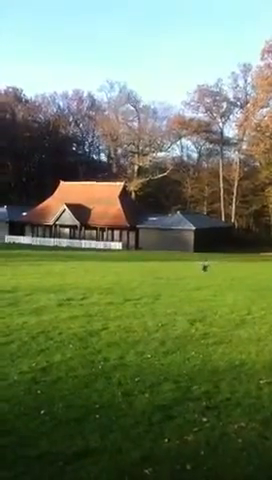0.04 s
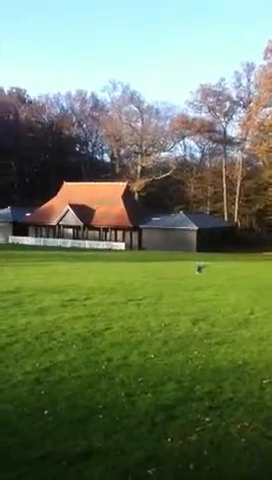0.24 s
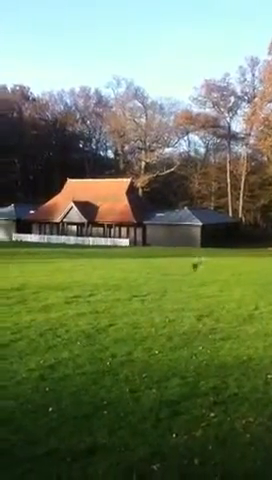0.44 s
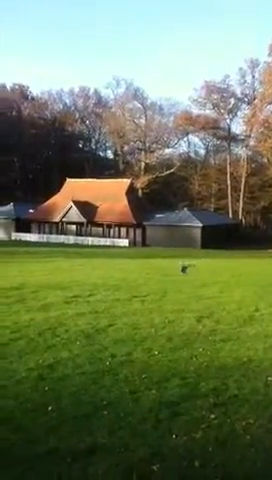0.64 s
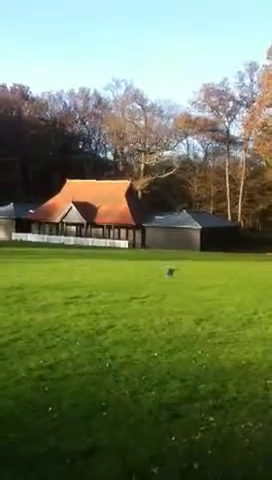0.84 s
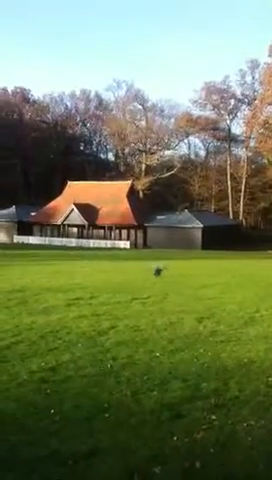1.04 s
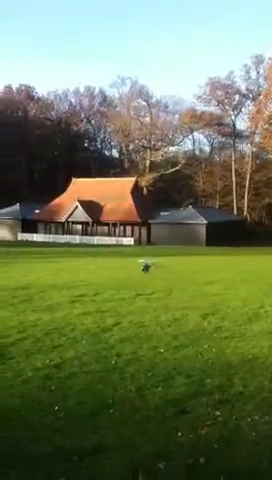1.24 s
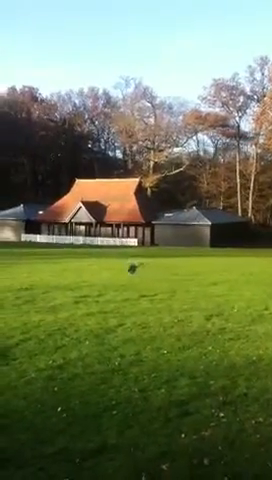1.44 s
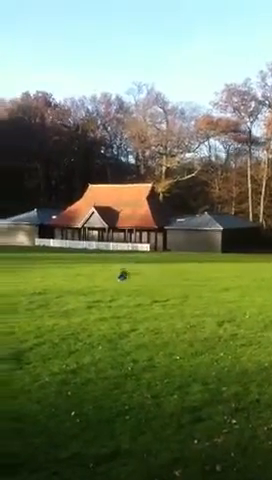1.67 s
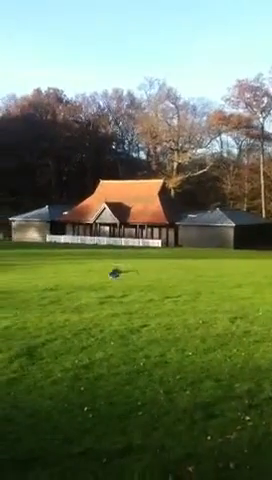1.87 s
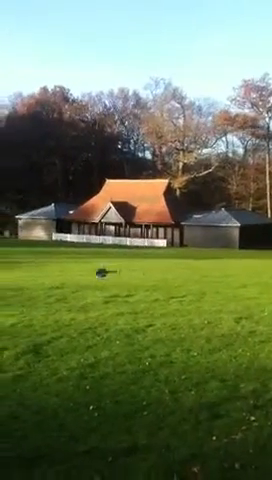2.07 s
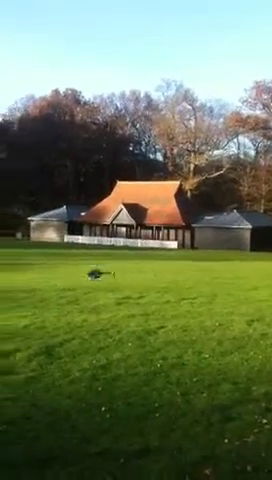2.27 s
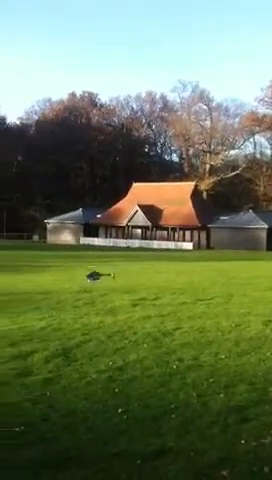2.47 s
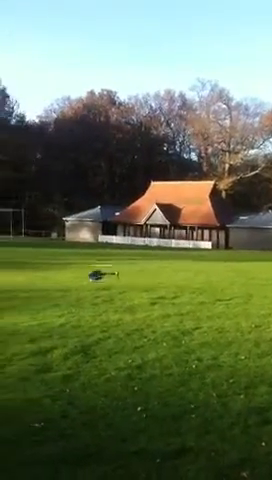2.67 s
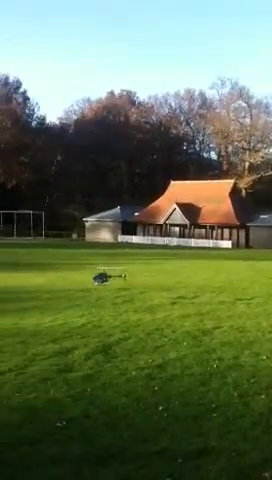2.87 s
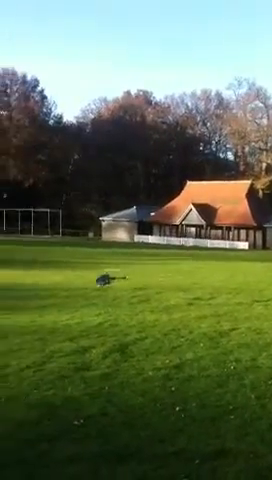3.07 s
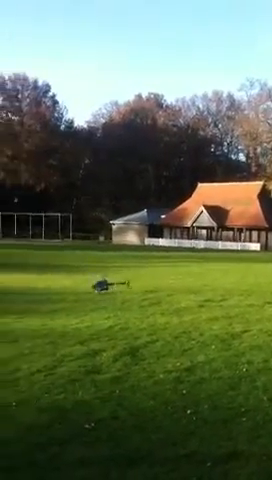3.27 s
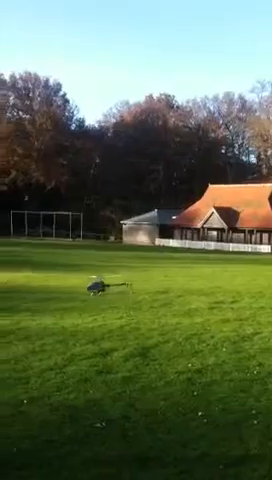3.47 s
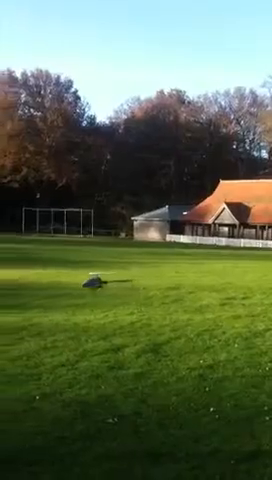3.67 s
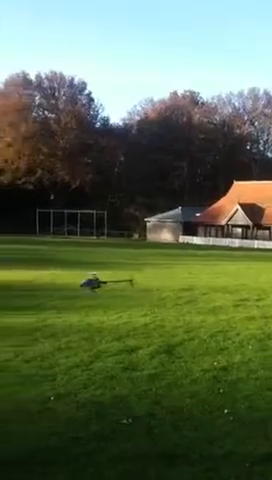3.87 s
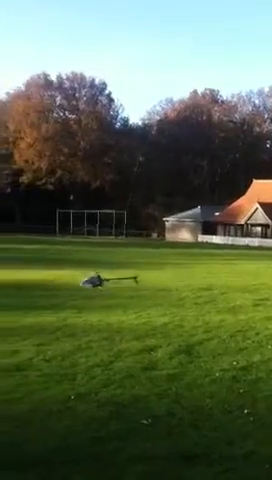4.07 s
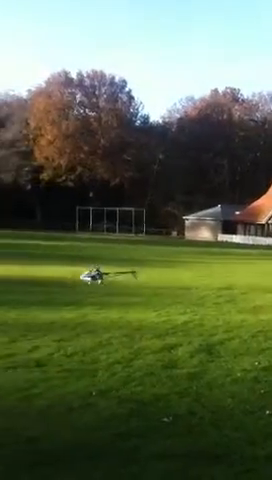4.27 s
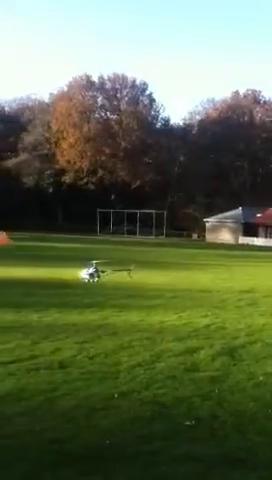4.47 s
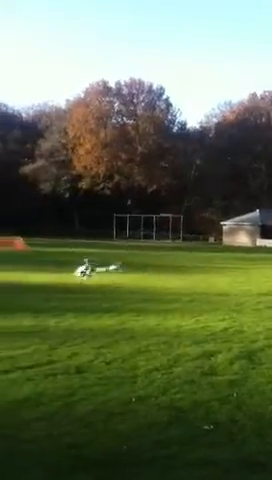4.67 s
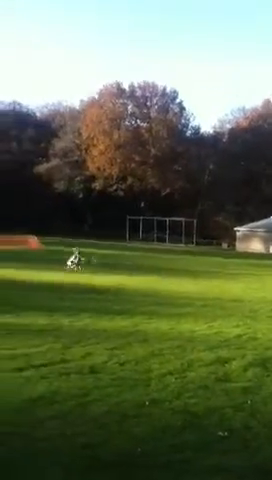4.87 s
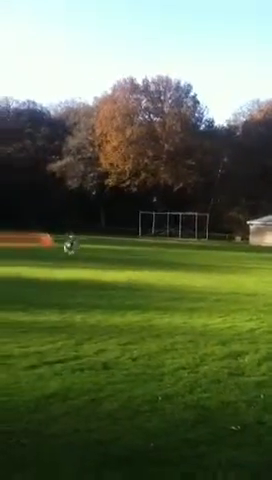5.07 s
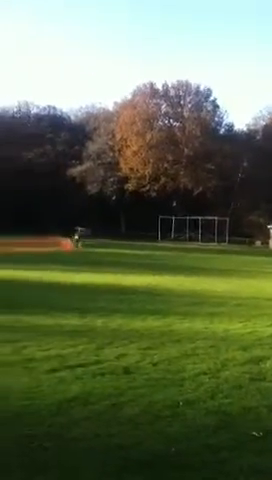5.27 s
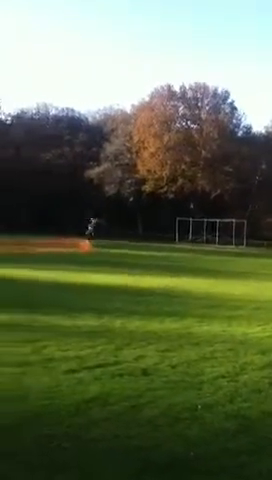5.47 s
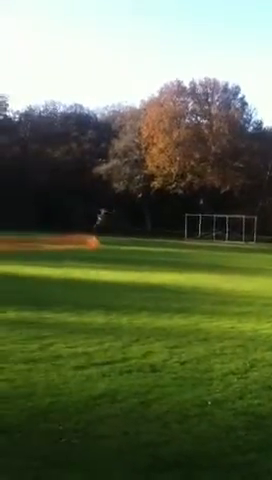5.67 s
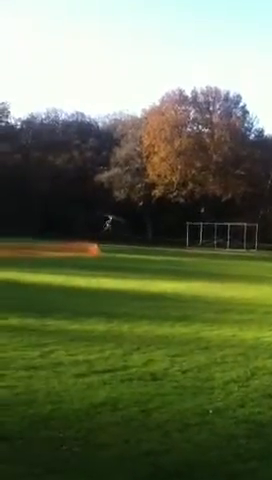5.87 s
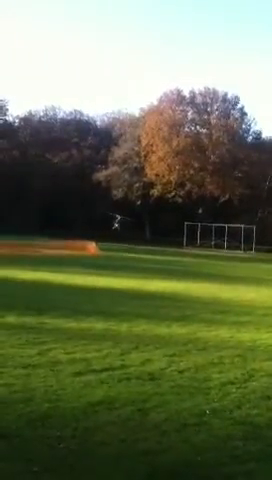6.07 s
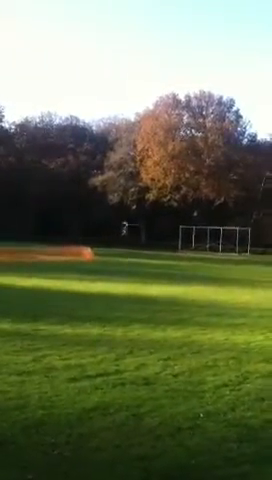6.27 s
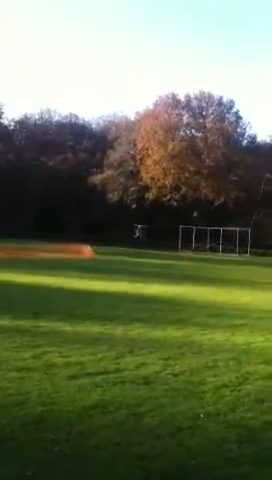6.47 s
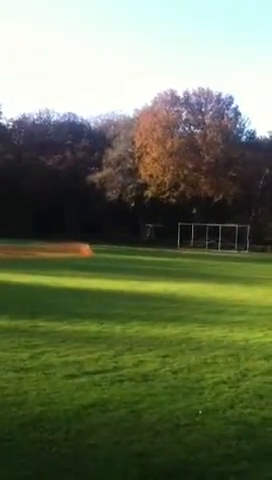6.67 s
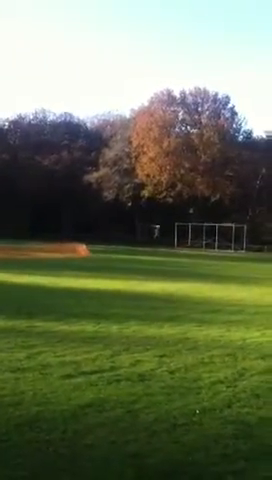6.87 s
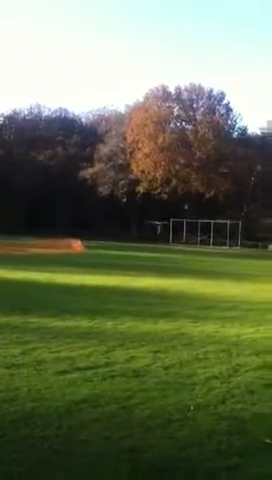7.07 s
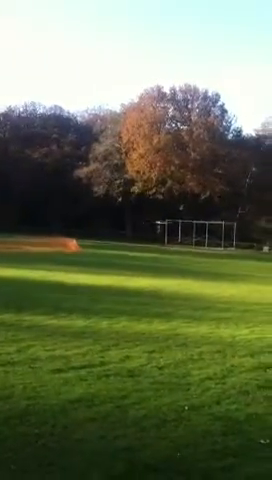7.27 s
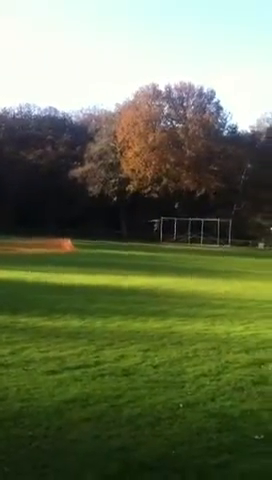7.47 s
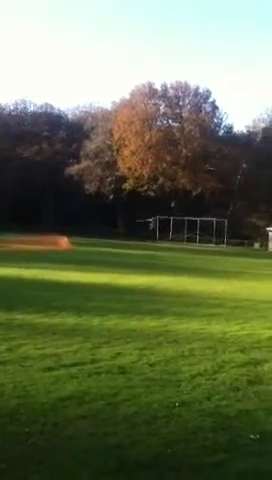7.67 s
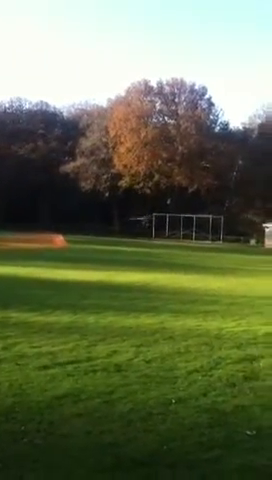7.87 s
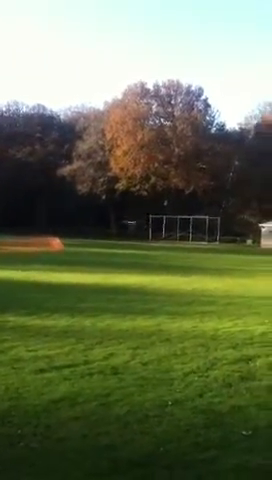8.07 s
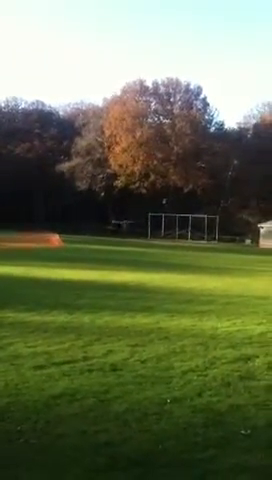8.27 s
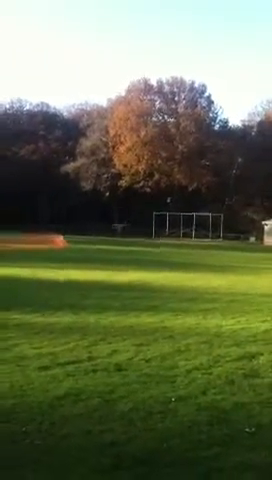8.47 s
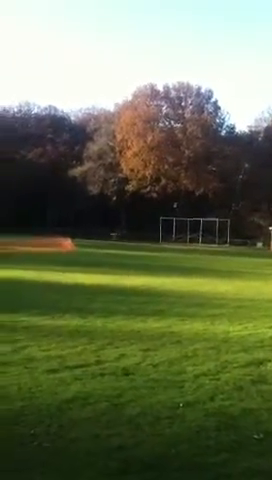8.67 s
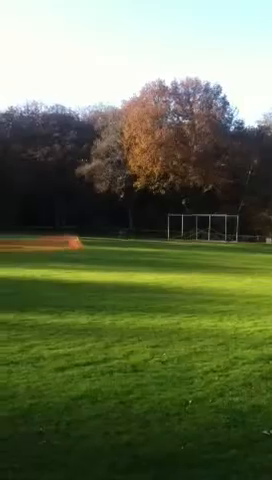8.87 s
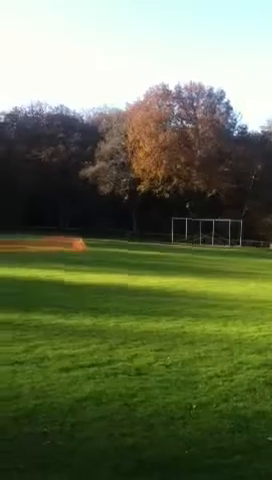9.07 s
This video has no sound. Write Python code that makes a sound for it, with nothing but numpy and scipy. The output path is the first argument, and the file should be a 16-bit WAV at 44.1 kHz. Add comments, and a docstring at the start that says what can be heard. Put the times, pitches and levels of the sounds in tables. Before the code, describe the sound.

An electric model helicopter is heard flying over an open field for about nine seconds. From the start, its motor and gears make a steady high whine of several layered tones, with an airy, finely fluttering rush of rotor blades and a faint low hum beneath. It begins fairly quiet and distant, then grows steadily louder over the first four seconds as it approaches. It is closest and loudest at around 4.5 seconds, where the high tones swell and dip quickly as it passes the microphone. The pitch falls very slightly at about 5 seconds. From there the helicopter recedes, its whine wavering and shimmering as it turns, and the rush thins out. By 8 to 9 seconds it is distant and quiet again, with the motor still running evenly.

```python
"""Model helicopter flying past

An electric model helicopter passes over open grass, turns and recedes. Motor, two gear meshes, bearings
and both rotors share one gear train, so each tone is a fixed multiple of the main shaft speed. Broadband
blade and gear noise rushes beneath. Each part has its own directivity, and pressure falls as 1/distance."""
import sys
import numpy as np
from scipy import signal
from scipy.io import wavfile

SR = 44100
rng = np.random.default_rng(int(sys.argv[2]) if len(sys.argv) > 2 else 0)


def transcribe(signal):
    """Save signal, clipped to [-1, 1], as a 16-bit WAV file at the path in sys.argv[1]."""
    frames = np.atleast_2d(signal).T
    limited = np.clip(frames, -1, 1)
    pcm = np.round(limited * 32767).astype(np.int16)
    wavfile.write(sys.argv[1], SR, pcm)


N = 403074
STEP = 40   # samples per control step
MOTOR = 150 / 14   # motor turns per shaft turn: 14-tooth pinion on a 150-tooth wheel
TAIL = 106 / 25   # tail turns per shaft turn: 106-tooth wheel on a 25-tooth pinion
BEATS_PER_TURN = .59
REFERENCE_M, LAST_BEARING_DEG = 20, 240

# Flight: t/s, shaft speed as heard/Hz, distance/m, bearing of the listener from the nose/deg
FLIGHT = [(0.0, 43.253, 39.2, 0.0), (0.64, 43.125, 30.6, 7.0), (1.06, 43.392, 26.1, 10.0),
          (1.24, 43.404, 24.3, 15.0), (2.26, 43.29, 17.6, 41.0), (2.86, 42.881, 14.7, 56.0),
          (3.34, 43.037, 13.4, 68.0), (3.76, 43.043, 12.6, 82.0), (4.3, 42.898, 9.6, 96.0),
          (4.54, 42.904, 7.9, 105.0), (4.72, 42.84, 8.5, 114.0), (4.96, 42.518, 10.8, 127.0),
          (5.2, 42.537, 13.7, 144.0), (5.86, 42.331, 18.9, 170.0), (6.04, 42.27, 20.5, 172.0),
          (6.22, 42.211, 22.1, 174.0), (6.58, 42.429, 25.7, 180.0), (7.06, 42.546, 31.2, 181.0),
          (7.36, 42.563, 34.5, 195.0), (7.9, 42.343, 41.3, 216.0), (8.62, 42.14, 46.6, 238.0),
          (9.14, 42.158, 50.1, 240.0)]
# Tone families (order = multiple of shaft speed): lead order, [(follower order, level re lead/dB)]
# Rows: 0, 1, 11, 12, 14, 15, 16, 18 motor harmonics; 2, 4 tail mesh; 3, 6 main mesh;
# 5, 17, 19, 20 main mesh sidebands; 7, 8 main blades; 9 tail blades; 10, 13, 21 bearings
FAMILIES = [ (MOTOR, [(MOTOR - 1, -30), (MOTOR + 1, -27)]), (2 * MOTOR, [(2 * MOTOR - 1, -21), (18.72, -28),
            (19.19, -24)]), (106, [(100, -18), (112, -19), (10 * MOTOR, -14), (11 * MOTOR, -16),
            (110.25, -19)]), (150, []), (212, [(206, -5), (218, -14), (200, -16), (205, -12),
            (18 * MOTOR, -12), (21 * MOTOR, -15), (22 * MOTOR, -16)]), (292, [(291.75, -5), (281.28, -16),
            (296, -11), (24 * MOTOR, -17), (26 * MOTOR, -17), (27 * MOTOR, -13)]), (300, [(308, -9),
            (316, -15), (318.75, -15), (29 * MOTOR, -14)]), (2, [(3, -5), (5, -5)]), (4, [(6, -9),
            (8, -9)]), (2 * TAIL, [(2 * TAIL + 1, -20), (4 * TAIL, -12.5)]), (17.19, [(TAIL, -14),
            (14.94, -13), (3 * TAIL, -13), (17.97, -12)]), (3 * MOTOR, []), (4 * MOTOR, [(6 * TAIL, -1),
            (6 * TAIL + 1, -2), (8 * TAIL, -4), (8 * TAIL + 1, -7), (10 * TAIL, -8), (38.59, -8)]),
            (46.62, []), (5 * MOTOR, [(6 * MOTOR, -5), (7 * MOTOR, -3), (12 * TAIL + 1, -9),
            (12 * TAIL + 2, -9), (14 * TAIL, -10), (14 * TAIL + 2, -9), (49.34, -12)]), (8 * MOTOR, []),
            (9 * MOTOR, [(95.28, -9)]), (134, [(131.28, -2), (12 * MOTOR, -5), (126, -11)]),
            (13 * MOTOR, []), (142, [(141, -13), (144, -16), (152.66, -7)]), (158, [(15 * MOTOR, -1),
            (16 * MOTOR, -7)]), (165.38, [(176.06, -11), (168.72, -14), (164.38, -9)]), ]
# Directivity, a row per family: lead's rms level/dB at REFERENCE_M, a column every 20 deg from the nose
TONE_DIRECTIVITY = [(-59, -58.5, -57.0, -57, -60, -67.5, -59, -54.5, -54, -54, -53.5, -55.0, -58),
                    (-48, -51, -58.5, -60, -60, -63.0, -58, -53.5, -52.0, -56.0, -68, -59.5, -52),
                    (-57, -59, -57.5, -61.0, -60.5, -69.5, -55, -54, -59.5, -70.5, -67, -62.5, -63.5),
                    (-69, -62.5, -75, -73.0, -63.0, -64.5, -69, -60, -50, -56.0, -54.5, -57, -53),
                    (-70.0, -69.5, -70.5, -66.5, -72, -63, -60, -68.5, -68, -66.5, -65.5, -68, -64),
                    (-74, -66, -71, -63, -72, -60, -81, -69, -65, -66.5, -64, -68.0, -71),
                    (-74.5, -65, -62.5, -62, -72.0, -67, -69, -65, -60, -68, -62, -72, -65.5),
                    (-79.5, -81, -83, -87, -88, -92.5, -89, -88, -102.5, -85, -85, -83, -80.5),
                    (-77, -81, -80.5, -95.5, -89, -80.5, -89, -96, -81.5, -72.5, -74.0, -85, -80),
                    (-63.5, -69, -69.5, -77.5, -78.5, -83.0, -67.5, -61, -59.5, -59, -59, -62.0, -64.5),
                    (-60.5, -66, -64, -68, -66.5, -72.0, -75, -79, -72, -71.5, -64, -65.5, -67),
                    (-76, -73, -75.5, -75.0, -69, -76, -74.0, -67.5, -64, -72.0, -65.5, -61.5, -69),
                    (-70.5, -76.5, -80, -72.5, -73, -76, -75.5, -76, -92, -78.5, -80, -88, -71),
                    (-68, -91.5, -72, -81.0, -77.5, -94, -77, -82.0, -71.5, -75, -69, -65.5, -79),
                    (-68.0, -69.5, -68.5, -75.5, -71, -75, -68.5, -74.5, -84.5, -75, -76, -72, -73.5),
                    (-65, -68, -64, -73, -74.0, -61.5, -65, -64, -69.0, -67, -67.5, -63.5, -65),
                    (-73.0, -73, -86, -96, -76.0, -61.5, -71, -60, -69, -64.5, -64, -67, -63),
                    (-80, -84.5, -76.0, -76, -79.5, -79, -75.0, -77, -73, -69.5, -65, -69.0, -68),
                    (-66, -70, -66, -77, -66.5, -66, -65.0, -64.5, -64, -63, -59, -77, -72.0),
                    (-71.0, -69, -74, -74.0, -74.0, -74, -76.0, -63, -63.0, -66.5, -72, -58.5, -59.5),
                    (-67, -74, -74, -74, -80, -79, -86.0, -77, -65, -65.0, -63.5, -64, -63.5),
                    (-72, -74, -75, -80, -65, -61.5, -67, -83, -67, -72, -83.0, -86, -82)]
# Narrow lobes sweeping past the listener, by family: t/s, gain/dB, spread/s
LOBES = {1: [(6.0, 3.5, 0.1), (7.95, 3.5, .08)], 2: [(2.05, -4.5, .16), (3.95, -7, .06), (4.62, 4.5, 0.069),
         (4.85, -17, 0.066), (4.12, 4, 0.069), (5.08, 0.5, .06), (6.2, 0.5, 0.062), (8.7, 8, .1)],
         3: [(2.25, 7, .1), (4.15, -7.5, 0.073), (5.0, 9.5, 0.064), (6.05, -5, 0.042), (8.6, 4, 0.092)],
         4: [(4.35, -8, .1), (4.51, 9.5, 0.044), (4.7, -14, 0.16), (8.58, 3, 0.054)], 5: [(.75, -8, .16),
         (3.8, 10, 0.065), (4.4, 2, .06), (5.72, 3, .06), (6.27, 5, .05), (7.04, 5, .1)],
         6: [(4.1, 9, 0.068), (4.3, -4, .05), (4.98, 5, .08), (5.5, 2, .06), (8.55, 5, .08)],
         8: [(1.8, 7, 0.14)], 14: [(4.5, 3, .08), (5.65, 8, .16)], 15: [(1.2, -11, .1), (2.1, -9, 0.17),
         (5.0, -18, 0.13), (8.35, -5, 0.13)], 16: [(3.05, 9, .16), (4.3, -12, .16), (6.95, -13, 0.13),
         (8.8, -12, 0.085)], 18: [(.95, -11, 0.18)], 19: [(3.85, -3, .1), (6.85, -9, 0.082),
         (7.6, -12, .1)], 20: [(4.35, 8, 0.18)], 21: [(3.7, -10, .1)]}
# Modulation by off-centre wheels, by family:
# phase swing/rad at shaft rate, at beat rate; amplitude depth at shaft rate, at beat rate
RUNOUT = {2: (0.16, 0.27, 0.36, 0.27), 3: (0.23, 0.57, 0.092, 0.056), 4: (.2, 0.18, 0.87, 0.59),
          5: (0.72, 1, 0.063, 0.053), 6: (0.44, 0.77, 0.046, 0.08)}
# Noise skirts from uneven tooth and blade contact, by family: width/Hz, level re lead/dB
SKIRTS = {0: (57, -19.5), 1: (15, -18), 2: (57, -13.5), 3: (370, -27), 4: (91, -4.5), 5: (330, -12),
          6: (160, -11), 9: (25, -15.5), 10: (24, -15), 12: (30, -4.5), 14: (27, -10), 15: (220, -9),
          21: (900, -2.4)}
# Spectrum of the rush: f/Hz, relative spectral density/dB
RUSH_SPECTRUM = [(30, -11), (50, -34), (80, -11), (150, -7), (400, -6.5), (800, -3.5), (1300, -4),
                 (2500, -4.5), (3800, -6), (6000, -2), (8200, -7), (10300, -8), (11600, -9), (12700, -5.5),
                 (14200, -18), (16500, -11)]
# Anchors of the rush's frequency ranges, bass first: f/Hz
RUSH_RANGES_HZ = [100, 500, 800, 1200, 2300, 6000, 12500]
# Directivity of the rush, a row per range above the bass: gain/dB, a column every 20 deg from the nose
RUSH_DIRECTIVITY = [(0, -2, -0.65, -0.5, -0.43, -1, 5, 2.5, 0, 0.46, -1, 2.8, 4.3),
                    (4.5, 4.0, 1, -1.3, -0.28, -10, -10, 0, 2.5, -2.8, -1.5, 3.8, 5.2),
                    (2, 0.5, -0.0, 1.5, 2.0, -2.5, 0.5, -0.5, -2, -0.79, 0.5, 3.1, 3.8),
                    (2.5, 2, 0.5, 1.0, 1.4, -1.5, -2.5, -0.5, -4.0, -1.2, 1.5, 3.8, 2.0),
                    (2, -1.0, -0.34, -1.7, 0.5, 1.0, 1, 1.5, 2, 1.9, 2.5, 3.5, 2.5),
                    (-2.5, -2, -0.91, -1.2, 0.0, 0.5, 0.5, 1.0, 4, 0.31, 3.5, 4.0, 5.5)]
# Resonances and dips of the frame: f/Hz, bandwidth/Hz, gain/dB
FRAME_MODES = [(740, 115, 3), (849, 125, 8.5), (1995, 130, 3), (4050, 1070, 5.5), (5300, 230, -3),
               (6430, 890, 2.5), (8780, 260, 8.5), (1025, 68, -0.5), (10260, 380, -12), (12670, 460, 8)]
# Second path of the motor's second harmonic, likely off buildings: t/s, lag/cycles, rms level/dB
ECHO_PATH = [(1.2, 1.5, -80), (1.8, 6.3, -69), (2.4, 10.19, -68), (3.0, 13.66, -66), (3.6, 16.3, -65),
             (4.2, 18.46, -66), (4.7, 19.7, -66), (5.2, 20.2, -70), (5.7, 19.27, -67), (6.0, 18.34, -67),
             (6.3, 16.96, -74), (7.0, 13.5, -84)]


def from_db(db):
    """Amplitude grows tenfold for every 20 dB."""
    return np.exp(np.asarray(db) * (np.log(10) / 20))


def at_steps(rows):
    """Linear interpolation of a timed table's columns to the control steps."""
    times, *columns = np.transpose(rows)
    return [np.interp(np.arange(N // STEP + 2) * STEP / SR, times, column) for column in columns]


def at_samples(control):
    """Linear interpolation from control steps to samples."""
    return (control[:-1, None] + np.diff(control)[:, None] * np.arange(STEP) / STEP).ravel()[:N]


def unit_rms(x):
    """Normalisation to unit mean power."""
    return x / np.sqrt(np.mean(x ** 2) + 1e-20)


def lowpass_noise(corner_hz, count, step=1):
    """Two equal poles make white noise fall 12 dB an octave above the corner."""
    pole = np.exp(-2 * np.pi * step * corner_hz / SR)
    return signal.lfilter([1], [1, -2 * pole, pole * pole], rng.standard_normal(count))


def drift(corner_hz):
    """Stationary random fluctuation of unit rms, one value per control step."""
    return unit_rms(lowpass_noise(corner_hz, N // STEP + 2002, STEP)[2000:])


def radiated_db(directivity, distance_m, bearing_deg):
    """Directivity sets the level at each bearing; spherical spreading takes 6 dB per doubled distance."""
    bearings = np.linspace(0, LAST_BEARING_DEG, len(directivity[0]))
    beamed_db = np.array([np.interp(bearing_deg, bearings, row) for row in directivity])
    return beamed_db + 20 * np.log10(REFERENCE_M / distance_m)


def lobes_db(family):
    """Narrow radiation lobes sweep past the listener as Gaussian swells and dips in level."""
    t = np.arange(N // STEP + 2) * STEP / SR
    return sum(db * np.exp(-.5 * ((t - peak_s) / spread_s) ** 2)
               for peak_s, db, spread_s in LOBES.get(family, []))


def lead_tone(family, phase, shaft_angle):
    """A sinusoid; off-centre wheels modulate the mesh tones in phase and amplitude, adding sidebands."""
    sway, slow_sway, throb, slow_throb = RUNOUT.get(family, (0, 0, 0, 0))
    once, beat = np.cos(shaft_angle), np.cos(BEATS_PER_TURN * shaft_angle)
    return np.cos(phase + sway * once + slow_sway * beat) * (1 + throb * once + slow_throb * beat)


def contact_skirt(phase, width_hz, level_db):
    """Uneven tooth and blade contact modulates a tone at random, spreading it into a noise band."""
    return from_db(level_db) * unit_rms(lowpass_noise(width_hz, N)) * np.cos(phase)


def drive_train(shaft_angle, levels_db, flutter_db, blur_rad, rocking_db):
    """Tones locked to one shaft; moving air perturbs phase and level, and rocking varies the level."""
    tones = np.zeros(N)
    for family, (order, followers) in enumerate(FAMILIES):
        sensitivity = np.sqrt(order / 100)   # high tones waver most; settings are rms at order 100
        angle = shaft_angle + blur_rad * sensitivity * at_samples(drift(25)) / order
        partials = lead_tone(family, order * angle, shaft_angle)
        partials *= at_samples(from_db(flutter_db * sensitivity * drift(20)))
        for follower_order, db in followers:
            partials += from_db(db) * np.cos(follower_order * angle + rng.uniform(0, 2 * np.pi))
        if family in SKIRTS:
            partials += contact_skirt(order * shaft_angle, *SKIRTS[family])
        level_db = levels_db[family] + lobes_db(family) + rocking_db * sensitivity * drift(4.4)
        tones += np.sqrt(2) * at_samples(from_db(level_db)) * partials
    return tones


def rush(shaft_angle, gains_db, flicker_db, shaft_depth, tail_depth):
    """Broadband blade and gear noise, amplitude-modulated by the shaft and the two tail blades."""
    bass_db = 0.12 * gains_db[0]   # the field's steady rumble shares the bass, so it varies little
    gains_db = np.vstack([bass_db, gains_db])
    spectrum_hz, spectrum_db = np.transpose(RUSH_SPECTRUM)
    white, common_drift = rng.standard_normal((2, N)), drift(30)
    pulsing = shaft_depth * np.cos(shaft_angle) + tail_depth * np.cos(2 * TAIL * shaft_angle)
    edges_hz = 28 * 2 ** (np.arange(29) / 3)   # third octaves
    noise = np.zeros(N)
    for k, (low, high) in enumerate(zip(edges_hz, edges_hz[1:])):
        hz = np.sqrt(low * high)
        row = np.interp(np.log(hz), np.log(RUSH_RANGES_HZ), np.arange(len(gains_db)))
        below = min(int(row), len(gains_db) - 2)
        band_db = gains_db[below] + (row - below) * (gains_db[below + 1] - gains_db[below])
        band_db += np.interp(np.log(hz), np.log(spectrum_hz), spectrum_db)
        brightness = min(hz / 2500, 1)   # the treble pulses and flickers most
        band_db += brightness * flicker_db * (common_drift + drift(20))
        band = signal.sosfilt(signal.butter(2, [low, high], "band", fs=SR, output="sos"), white[k % 2])
        noise += band * (1 + brightness * pulsing) * at_samples(from_db(band_db))
    return noise


def frame_resonances(x):
    """Each mode of the frame acts as a damped resonator that lifts or cuts its own band."""
    for hz, width_hz, gain_db in FRAME_MODES:
        r = np.exp(-np.pi * width_hz / SR)
        feedback = [1, -2 * r * np.cos(2 * np.pi * hz / SR), r * r]
        mode = signal.lfilter([(1 - r * r) / 2, 0, (r * r - 1) / 2], feedback, x)
        x = x + (from_db(gain_db) - 1) * mode
    return x


def motor_echo(shaft_angle):
    """Two-path interference: a changing lag makes the motor's second harmonic beat with its echo."""
    lag_cycles, level_db = at_steps(ECHO_PATH)
    phase = 2 * MOTOR * shaft_angle - 2 * np.pi * at_samples(lag_cycles)
    return np.sqrt(2) * at_samples(from_db(level_db)) * np.cos(phase)


def scene():
    """Superposition at the listener of tones, rush and echo, all timed by one shaft angle."""
    shaft_hz, distance_m, bearing_deg = at_steps(FLIGHT)
    shaft_angle = 2 * np.pi * np.cumsum(at_samples(shaft_hz)) / SR
    tone_levels_db = radiated_db(TONE_DIRECTIVITY, distance_m, bearing_deg)
    tones = drive_train(shaft_angle, tone_levels_db, flutter_db=.8, blur_rad=.08, rocking_db=1.0)
    rush_gains_db = radiated_db(RUSH_DIRECTIVITY, distance_m, bearing_deg)
    noise = rush(shaft_angle, rush_gains_db, flicker_db=.5, shaft_depth=0.038, tail_depth=0.17)
    noise = from_db(-53.5) * unit_rms(frame_resonances(noise))
    return (tones + noise + motor_echo(shaft_angle))[None, :]


def record(dry):
    """An elliptic low-pass filter limits the bandwidth steeply at 15750 Hz."""
    return signal.sosfilt(signal.ellip(12, .5, 60, 15750, fs=SR, output="sos"), dry)


dry = scene()
out = record(dry)
transcribe(out)
```